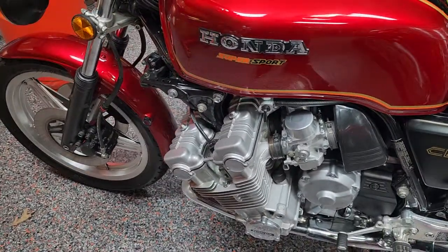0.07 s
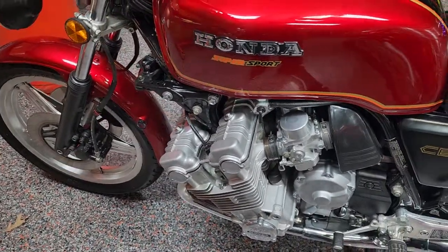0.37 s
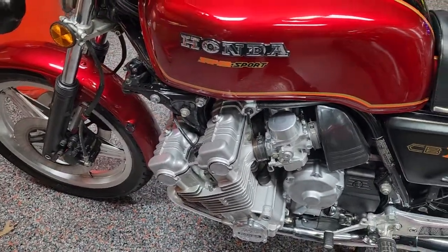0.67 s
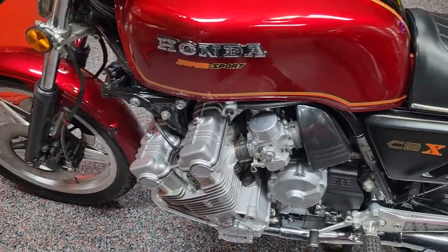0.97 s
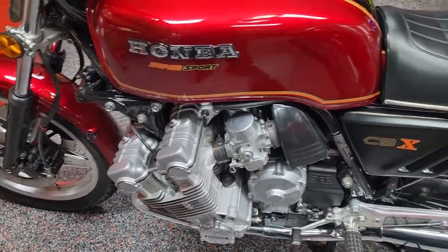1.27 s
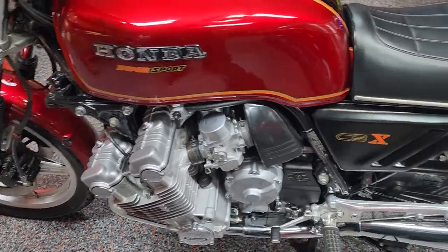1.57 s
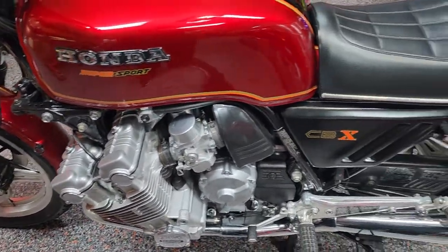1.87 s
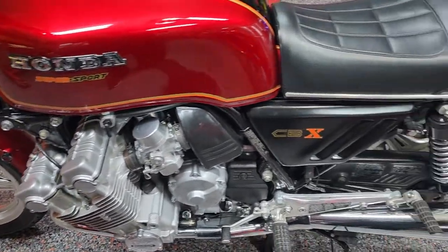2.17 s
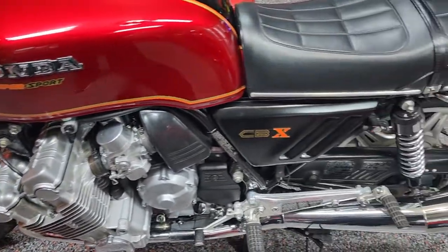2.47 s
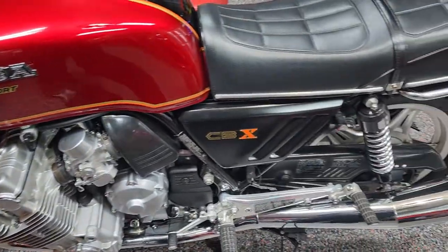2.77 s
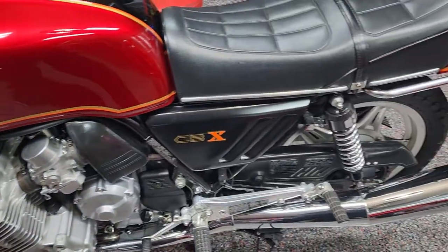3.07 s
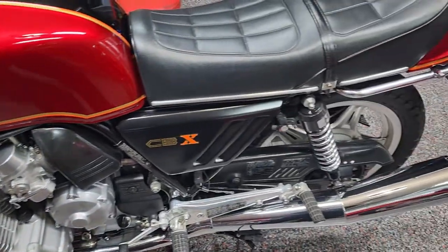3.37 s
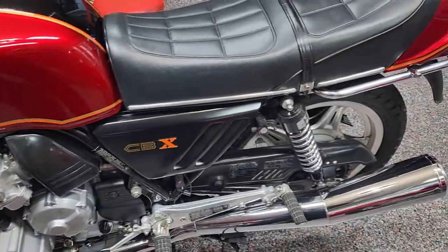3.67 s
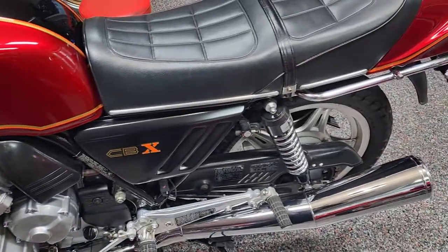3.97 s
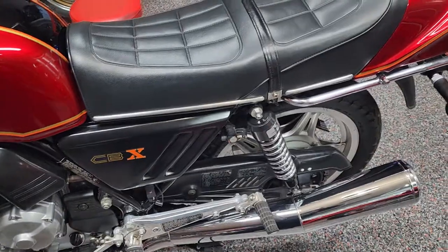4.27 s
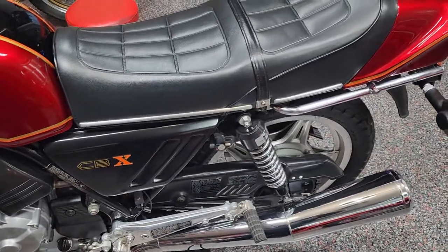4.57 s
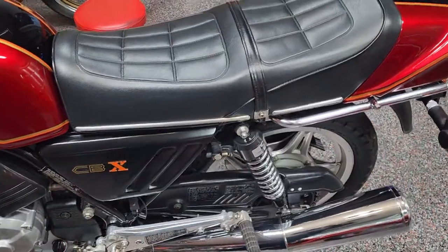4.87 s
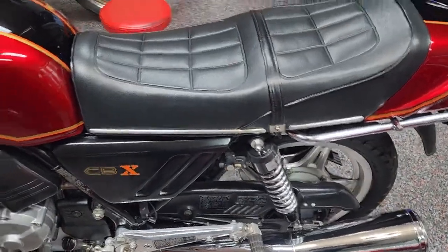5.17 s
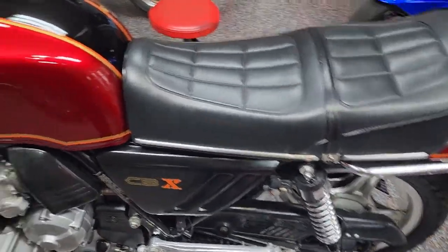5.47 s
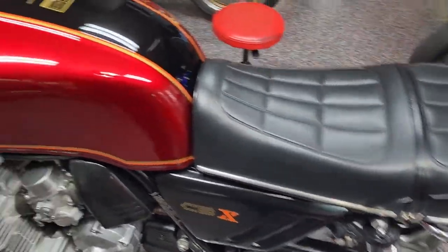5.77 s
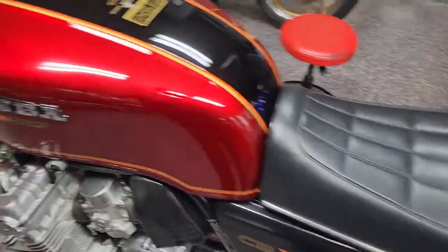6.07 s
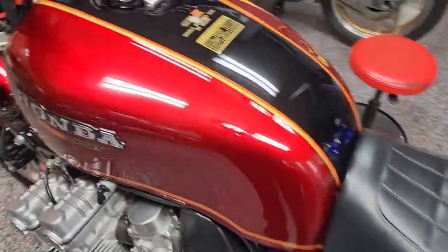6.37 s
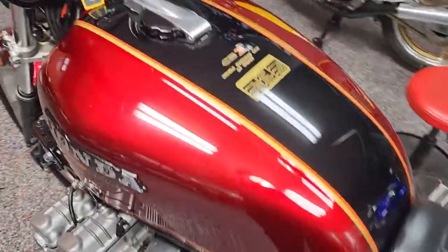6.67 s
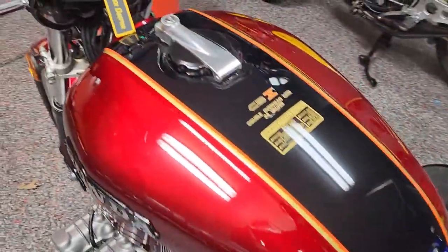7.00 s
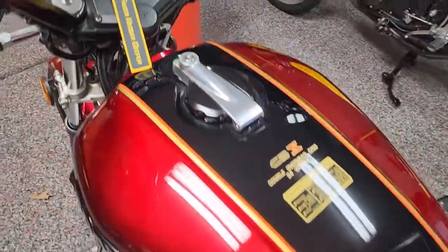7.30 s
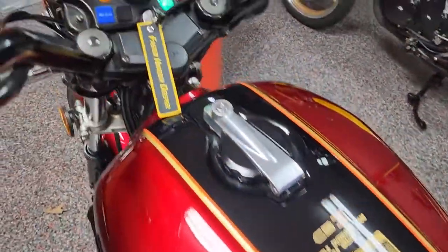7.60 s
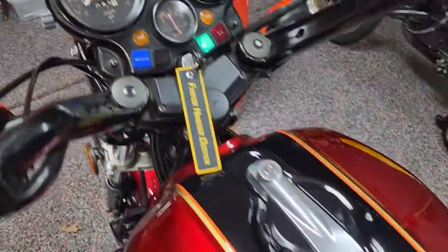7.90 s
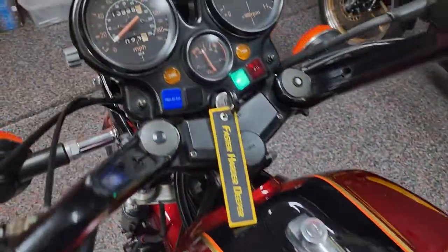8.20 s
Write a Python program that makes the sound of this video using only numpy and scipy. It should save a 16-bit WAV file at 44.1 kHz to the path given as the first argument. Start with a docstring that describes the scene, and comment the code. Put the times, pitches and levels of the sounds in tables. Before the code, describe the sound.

Close up in a room, a motorcycle engine runs without a break, a low exhaust hum under busy metallic ticking and a faint high ring. The idle starts slower, climbs gently in pitch and settles at a faster, even pace. As the microphone travels from the engine past the pipes and up over the fuel tank, the clatter eases and the hum turns a little thinner.

```python
"""A low engine drone: a six-cylinder motorcycle idles indoors, speeds up a little and holds a fast idle.
The drone is a stack of tones, each a whole multiple (an "order") of the engine's cycle rate, shaped by
the pipes and the room. Every firing also puffs out gas. Behind it, valves and cam chain clatter in the
finned casing, and a thin metallic ring comes and goes. The microphone moves along the bike, rising
from beside the pipes to above the tank."""
import sys
import numpy as np
from scipy import signal
from scipy.fft import rfft, irfft
from scipy.io import wavfile
from scipy.ndimage import uniform_filter1d

SR = 44100
rng = np.random.default_rng(int(sys.argv[2]) if len(sys.argv) > 2 else 0)


def to_wav(s):
    """Save 16-bit WAV."""
    ch = np.atleast_2d(s).T  # columns
    pcm = np.round(np.clip(ch, -1, 1) * 32767)  # PCM
    wavfile.write(sys.argv[1], SR, pcm.astype(np.int16))


N = 367794
T = np.arange(N) / SR
HZ = np.fft.rfftfreq(N, 1 / SR)
CYLINDERS = 6  # each fires once in an engine cycle


def amp(db):
    """Turns decibels into a gain to multiply by."""
    return 10 ** (np.asarray(db) / 20)


def unit_power(x):
    """Scales a signal to an average power of 1."""
    return x / np.sqrt(np.mean(abs(x) ** 2) + 1e-20)


def curve(rows):
    """Joins (time, value) points with straight lines."""
    return np.interp(T, *np.transpose(rows))


def spell(start_s, end_s, fade_s=0.049):
    """1 between two times and 0 outside, with quick fades."""
    return np.clip(np.minimum(T - start_s, end_s - T) / fade_s + .5, 0, 1)


def drift(rate_hz):
    """A smooth random wobble, mostly slower than rate_hz."""
    steps = N // 64 + 2
    hz = np.fft.rfftfreq(steps, 64 / SR)
    slow = irfft(rfft(rng.standard_normal(steps)) / (1 + (hz / rate_hz) ** 2), steps)
    return np.interp(T, np.linspace(0, T[-1], steps), unit_power(slow))


def microphone():
    """Closeness to the engine in dB, and height: 0 beside the pipes, 1 above the tank."""
    # The path along the bike: time_s, closeness_db
    path = [(0.0, -1), (1.3, -0.5), (2.15, 0.1), (2.7, -2), (3.4, -5), (5.7, -5), (6.6, -4), (8.34, -5)]
    return curve(path), np.interp(T, [3.7, 8], [0, 1])


def heard_db(layer):
    """How loud a noisy layer is where the microphone is."""
    # Loudness by layer name: close_db, db_per_closeness_db, above_tank_change_db
    levels = {"puffs": (-35, 1.37, 1.9), "casing": (-32.5, 1, 0.26), "fin": (-39, 1.72, 0.8),
              "valves": (-38, 1.0, -1.3), "chain": (-45.5, 0.37, -4), "ring": (-48.2, 0.48, -4.8)}
    close_db, slope, above_tank_db = levels[layer]
    closeness_db, height = microphone()
    return close_db + slope * closeness_db + above_tank_db * height


def blows(count, size, rise_s, decay_s):
    """Power that swells and dies away each time count passes a whole number; its average is 1."""
    whole = np.floor(count)
    power = (np.diff(whole, prepend=whole[0]) > 0) * size ** 2
    for seconds in (rise_s, decay_s):
        power = signal.lfilter([1], [1, -np.exp(-1 / (seconds * SR))], power)
    return power / power.mean()


def cycle_noise(firings):
    """Noise that repeats in every engine cycle, so it has the engine's pitch."""
    grid = np.arange(1024) / 1024
    return unit_power(np.interp(firings / CYLINDERS, grid, rng.standard_normal(len(grid)), period=1))


def resonate(power, spectrum, modes, band_hz, shared, ripple_db, repeating=0):
    """Noise bursts ring a body at its own pitches (modes); the level is set to 1 within band_hz."""
    noise = rng.standard_normal((3, N))  # left, right, shared by both
    stereo_noise = np.sqrt(shared) * noise[2] + np.sqrt(1 - shared) * noise[:2]
    bursts = np.sqrt(power) * (stereo_noise + repeating)
    hz, db = np.transpose(spectrum)
    ripple = uniform_filter1d(rng.standard_normal((2, len(HZ))), size=110)
    weak_modes = unit_power(uniform_filter1d(ripple, size=70))
    gain = amp(np.interp(np.log(HZ + 1), np.log(hz), db) + ripple_db * weak_modes)
    for pitch_hz, width_hz, lift_db in modes:
        gain = gain * (1 + (amp(lift_db) - 1) / (1 + 2j * (HZ - pitch_hz) / width_hz))
    shaped = rfft(bursts) * gain
    in_band = (HZ > band_hz[0]) & (HZ < band_hz[1])
    return irfft(shaped, N) / irfft(shaped.mean(0) * in_band, N).std()


def tappets(firings, fast):
    """Tappets, which push the valves, strike six unequal blows a cycle, each a bit early or late."""
    # Relative strength of each blow: slow_idle_db, fast_idle_db
    strengths = [(2.5, 2), (5, 4), (0, 0), (6, 1.5), (-1, 2.5), (7, 3.5)]
    cam = firings - .52
    which = np.floor(cam + .5).astype(int) % CYLINDERS
    slow_db, fast_db = np.array(strengths)[which].T
    size = amp(slow_db + fast * (fast_db - slow_db) + 1.3 * rng.standard_normal(N))
    return blows(cam + .07 * drift(60), size, rise_s=0.001, decay_s=0.0068)


def valve_gear(firings, fast):
    """Tappet blows and loose chain clicks ring the casing and its fins over the room's steady wash."""
    # Tone colour of each ringing part: pitch_hz, relative_db
    casing_spectrum = [(600, -24.5), (1000, -10), (1170, -6.5), (1340, 1), (1550, 0), (1850, -1.5),
                       (2200, -4.5), (2550, -11), (3300, -19.5), (6000, -47)]
    fin_spectrum = [(1300, -65), (1480, -20), (1512, -4), (1524, 0), (1536, -6.5), (1549, -1), (1575, -23),
                    (1800, -39.5)]
    valve_spectrum = [(1500, -34), (2300, -4.5), (3000, 1.5), (3800, 1), (4600, -0.5), (5700, -2.5),
                      (6450, -1), (7100, -4), (8400, -6.5), (10000, -12.5), (16000, -33)]
    chain_spectrum = [(4000, -25), (8000, -2), (9600, -0.5), (10300, 3), (11000, -0.5), (12500, 1.5),
                      (13700, 2.5), (15600, 0)]
    ring_spectrum = [(7500, -48), (8850, -12), (9060, -6), (9190, 0), (9340, -12), (9550, -12),
                     (11000, -48)]
    # Where the parts ring most strongly: pitch_hz, width_hz, lift_db
    casing_modes = [(1660, 17, 4.5), (2252, 31, 3.5)]
    valve_modes = [(2880, 35, 4.3), (5060, 420, 6.8)]
    chain_modes = [(11600, 200, 2.9), (13600, 300, 2)]

    taps = tappets(firings, fast)
    links = np.cumsum(rng.random(N) < 400 / SR)  # about 400 chain clicks a second
    clicks = taps * blows(links, amp(3.3 * rng.standard_normal(N)), rise_s=.0003, decay_s=.0009)
    knocks = 1 + 0.23 * tappets(firings, fast)  # the 1 is the steady wash
    casing = resonate(knocks, casing_spectrum, casing_modes, band_hz=(1200, 2400),
                      shared=0.04, ripple_db=2.0, repeating=0.11 * cycle_noise(firings))
    fins = resonate(knocks, fin_spectrum, [], band_hz=(1500, 1555),
                    shared=0.16, ripple_db=-2.5, repeating=0.2 * cycle_noise(firings))
    valves = resonate(1 + .5 * taps + 0.18 * clicks, valve_spectrum, valve_modes,
                      band_hz=(3000, 7000), shared=0.012, ripple_db=2.0)
    chain = resonate(1 + 0.81 * taps + .7 * clicks, chain_spectrum, chain_modes,
                     band_hz=(10000, 15000), shared=.02, ripple_db=-0.5)
    ring = resonate(1 + 2 * taps, ring_spectrum, [], band_hz=(9000, 9450), shared=0.04, ripple_db=2.5)

    closeness_db, _ = microphone()
    pan_db = (1.35 - 0.28 * closeness_db) * np.array([[.5], [-.5]])  # ticking leans to the left
    fin_db = heard_db("fin") + drift(rate_hz=5.6)  # the ringing wavers by about 1 dB
    ring_db = heard_db("ring") + drift(rate_hz=5.6)
    return ((casing * amp(heard_db("casing")) + fins * amp(fin_db)) * amp([[-.8], [.8]])
            + valves * amp(heard_db("valves") + 1.43 * pan_db)
            + chain * amp(heard_db("chain") + pan_db)
            + ring * amp(ring_db))


def gas_puffs(firings):
    """Each firing pushes a puff of gas down the pipe, partly alike in every cycle."""
    # Tone colour of the gas: pitch_hz, relative_db
    spectrum = [(15, -6), (35, -2), (60, 4), (110, 7), (200, 7.5), (310, 3), (480, -1.5), (610, -2),
                (780, -3.5), (1000, -5), (1500, -16.5), (3000, -54)]
    # Where the pipe rings: pitch_hz, width_hz, lift_db
    pipe_modes = [(418, 53, 3.5), (563, 39, 2.5), (620.5, 25, 5)]
    size = amp(2 * rng.standard_normal(N))
    power = 1 + 0.93 * blows(firings, size, rise_s=0.0012, decay_s=0.006)
    gas = resonate(power, spectrum, pipe_modes, band_hz=(450, 1000),
                   shared=0.23, ripple_db=2.0, repeating=0.19 * cycle_noise(firings))
    middle = gas.mean(0)
    sides = irfft(rfft(gas - middle) * HZ ** 2 / (HZ ** 2 + 180 ** 2), N)  # bass stays in the middle
    return amp(heard_db("puffs")) * (middle + sides) * amp([[.3], [-.3]])


def order_tone(firings, order, flutter, flutter_hz, lag, left_lead):
    """One engine tone, shaken by uneven burns. left_lead puts the left ear ahead of the right."""
    shake = 1 + flutter * (drift(flutter_hz) + 1j * drift(flutter_hz))
    angle = 2 * np.pi * round(order) * firings / CYLINDERS - lag  # radians
    ear_shift = left_lead * np.array([[.5], [-.5]])
    return -np.sqrt(2) * (unit_power(shake) * np.exp(1j * (angle + ear_shift))).real


def order_stack(firings, stage, table, flutter):
    """Adds up a table of engine tones at the current stage's levels; the room scatters their timing."""
    total = 0
    for order, *levels_db in table:
        gain = amp(np.interp(stage, np.arange(len(levels_db)), levels_db))
        total += gain * order_tone(firings, order, flutter, flutter_hz=10.4,
                                   lag=2 * np.pi * rng.random(), left_lead=0.31 * rng.standard_normal())
    return total


def exhaust(firings, firing_hz, stage, fast):
    """The pipes drone on three low tones, with a hum above and a weak throb from unequal cylinders."""
    # How well pipes and room carry the drone: pitch_hz, level_db
    pipe_response = [(65, -21), (67.5, -18), (70.5, -12.5), (82, -14), (98.5, -19), (105.5, -33),
                     (113, -20.5), (123, -23), (133, -16), (140, -24), (163, -37.5)]
    # Tones of the hum and the throb: order, slow_idle_db, speeding_up_db, fast_idle_db, thin_spell_db
    hum_orders = [(15, -2.5, -1.5, -2.5, -14), (18, -8, -11.5, -4.5, -6), (21, -9.5, -10, -7.5, -1.5),
                  (24, -4.5, -6.5, -17.5, -18)]
    throb_orders = [(3, -52, -49, -44.5, -54), (4, -42, -45, -41.5, -39), (5, -43, -48, -54, -56),
                    (7, -48, -33, -54, -54), (8, -25.5, -33.5, -33, -32), (10, -37, -34, -47, -42),
                    (11, -42, -34, -42, -45), (14, -38, -29, -49, -50), (17, -66, -52, -48, -54),
                    (20, -67, -45, -61, -59), (23, -40, -43, -62, -50), (27, -44, -50, -50, -45),
                    (30, -49.5, -46.5, -40.5, -41.5), (33, -46, -42, -53, -57),
                    (36, -38, -40, -54.5, -48.5), (39, -58, -45, -68, -58), (46, -48, -65, -64, -47.5),
                    (51, -44.5, -57, -55.5, -55), (70.6, -64, -68, -55, -55)]
    # Gain of the whole hum: slow_idle_db, speeding_up_db, fast_idle_db, thin_spell_db
    hum_levels = [-28, -23, -27.5, -26.5]
    # Moments when the hum swells or drops out: start_s, length_s, change_db
    hum_shifts = [(1.72, 0.65, 2.5), (2.75, 0.36, -3.5), (4.278, 0.085, -19), (4.415, 0.22, -7),
                  (5.155, 0.13, -11), (5.56, 0.21, -5), (8.11, 0.053, -8)]

    _, height = microphone()  # the upper tones fade above the tank
    response = np.transpose(pipe_response)
    firing_db = np.interp(firing_hz, *response)
    beat_db = np.interp(1.5 * firing_hz, *response) - 8.5 * height  # the two pipes fire in turn
    octave_db = np.interp(2 * firing_hz, *response) - 5 * height
    uneven = 1 + 1.3 * (1 - fast)  # fuel burns less evenly at slow idle
    octave_lag = np.interp(stage, [0, 1], [2.7, .8])  # shifts as it climbs through the pipe's resonance
    firing = order_tone(firings, 6, 0.044 * uneven, flutter_hz=5.9, lag=0, left_lead=0.21)
    beat = order_tone(firings, 9, 0.063 * uneven, flutter_hz=16, lag=-0.5, left_lead=0.11)
    octave = order_tone(firings, 12, 0.064 * uneven, flutter_hz=9.9, lag=octave_lag, left_lead=0.28)
    drone = amp(firing_db) * firing + amp(beat_db) * beat + amp(octave_db) * octave

    shift_db = sum(change_db * spell(start, start + length) for start, length, change_db in hum_shifts)
    hum_db = np.interp(stage, [0, 1, 2, 3], hum_levels) - 6.5 * height + shift_db
    hum = amp(hum_db) * order_stack(firings, stage, hum_orders, flutter=.055 * uneven)
    half = len(throb_orders) // 2
    low_throb = order_stack(firings, stage, throb_orders[:half], flutter=0.16)
    high_throb = order_stack(firings, stage, throb_orders[half:], flutter=.15)
    throb = low_throb + high_throb * amp(0.39 * shift_db)
    return drone * amp([[.3], [-.3]]) + (hum + throb) * amp([[.8], [-.8]])


def scene():
    """One crankshaft drives every layer."""
    # Engine speed: time_s, firing_hz
    speed = [(0.0, 66.43), (0.45, 66.36), (1.0, 65.06), (1.25, 68.17), (1.62, 67.48), (1.85, 69.26),
             (2.5, 71.19), (3.3, 81.42), (3.55, 81.2), (3.8, 80.07), (4.35, 82.38), (5.0, 81.01),
             (5.22, 82.89), (5.4, 81.6), (6.2, 81.68), (7.05, 81.96), (7.4, 82.65), (8.34, 82.27)]
    # Firing rate at each stage: slow_idle_hz, speeding_up_hz, fast_idle_hz
    stage_hz = [67.2, 69.7, 78.7]
    firing_hz = curve(speed)
    firings = np.cumsum(firing_hz) / SR - 0.12  # running count
    fast = np.interp(firing_hz, [stage_hz[0], stage_hz[-1]], [0, 1])
    thin_spell = spell(7.22, 8.12)  # stage 3: the hum turns thinner and higher
    stage = np.interp(firing_hz, stage_hz, [0, 1, 2]) + thin_spell
    return exhaust(firings, firing_hz, stage, fast) + gas_puffs(firings) + valve_gear(firings, fast)


def record(dry):
    """Cuts the treble above 15750 Hz."""
    lowpass = signal.firwin(601, 15750, window=("kaiser", 9), fs=SR)
    return signal.oaconvolve(dry, lowpass[None], "same")


dry = scene()
out = record(dry)
to_wav(out)
```